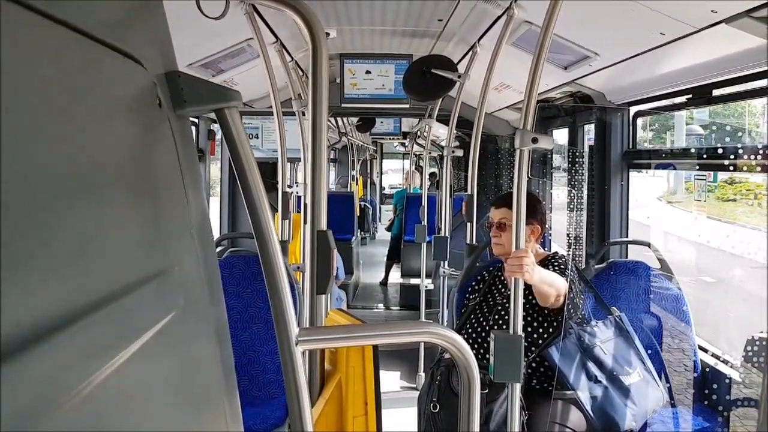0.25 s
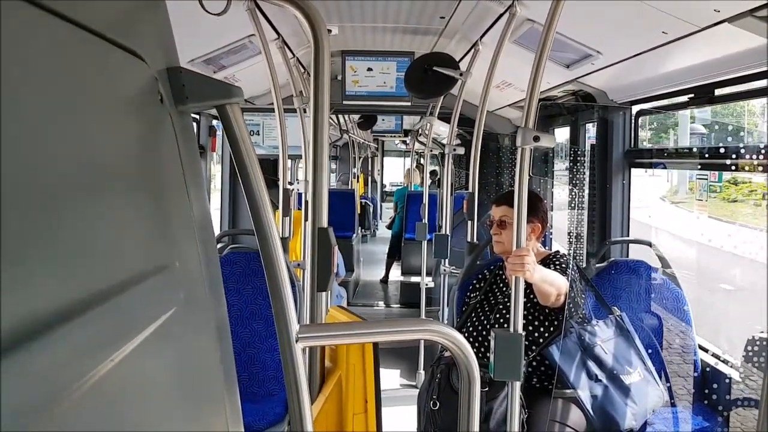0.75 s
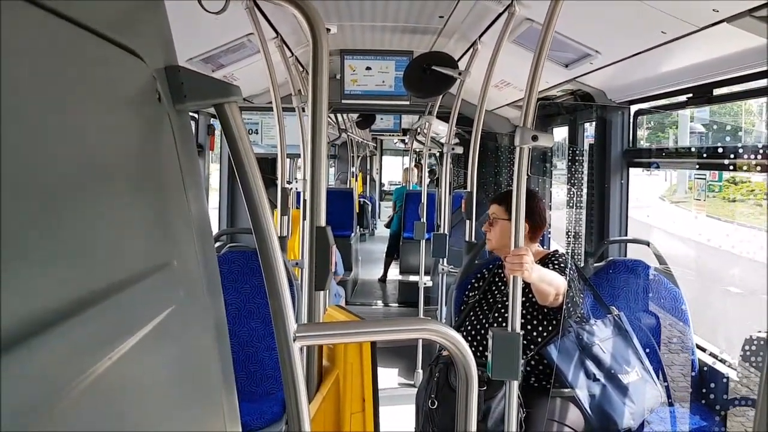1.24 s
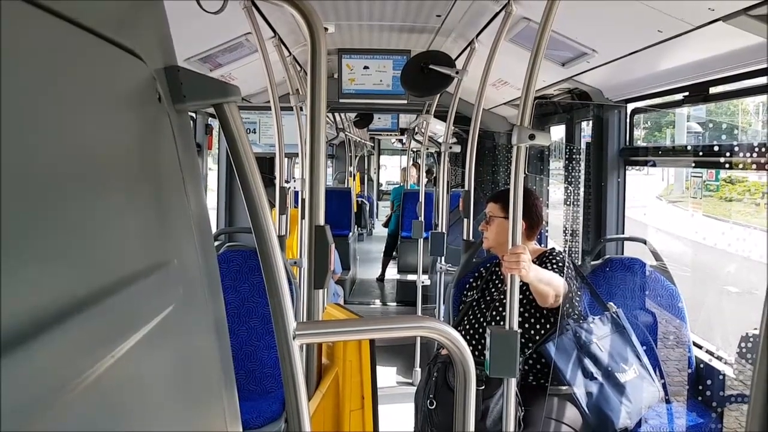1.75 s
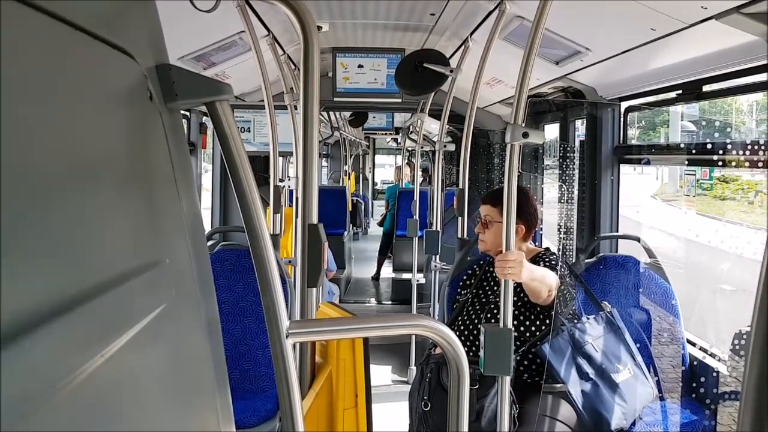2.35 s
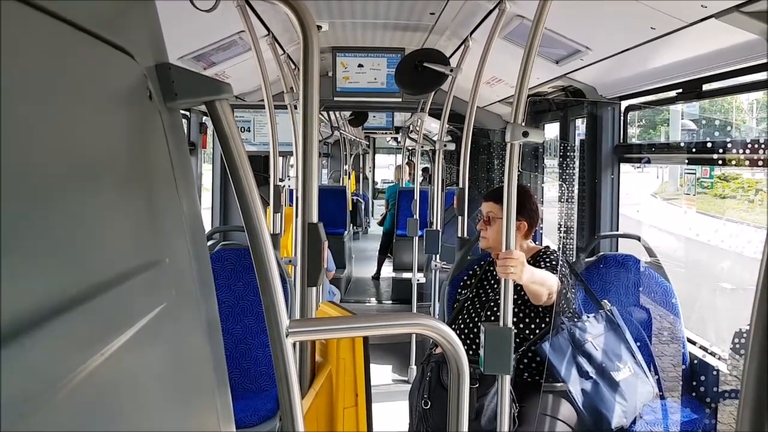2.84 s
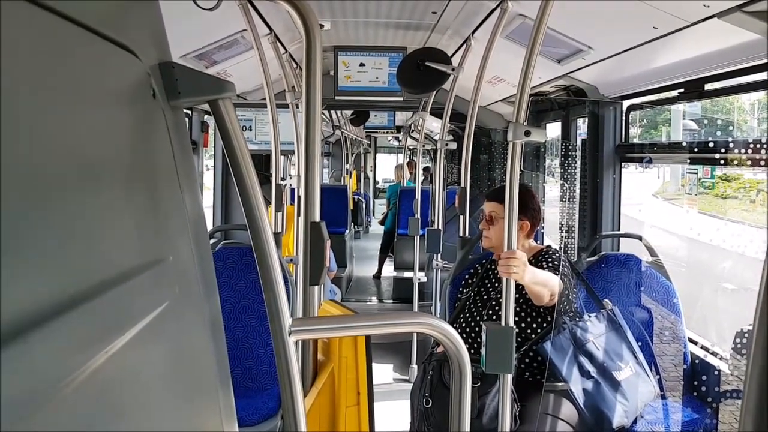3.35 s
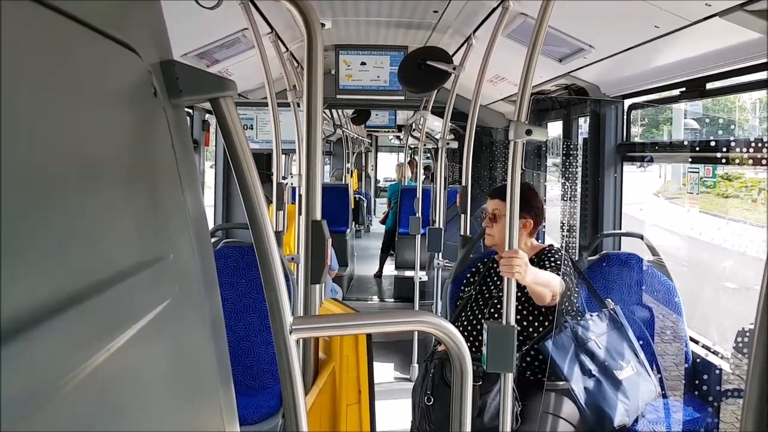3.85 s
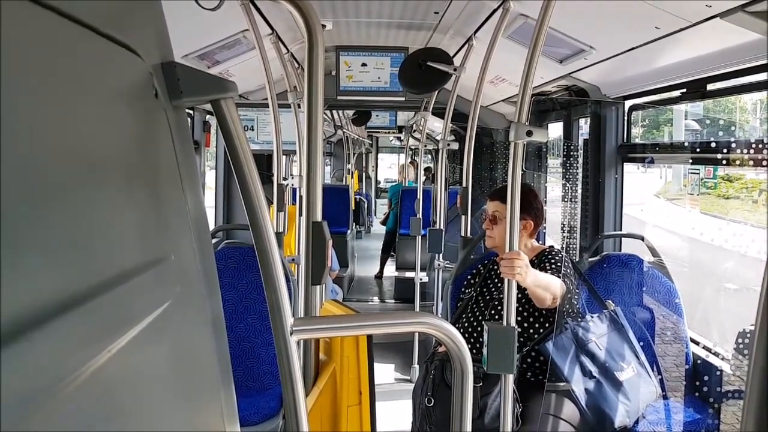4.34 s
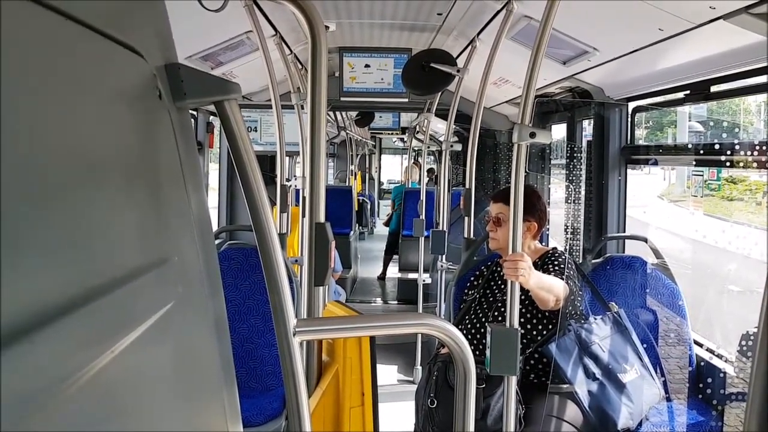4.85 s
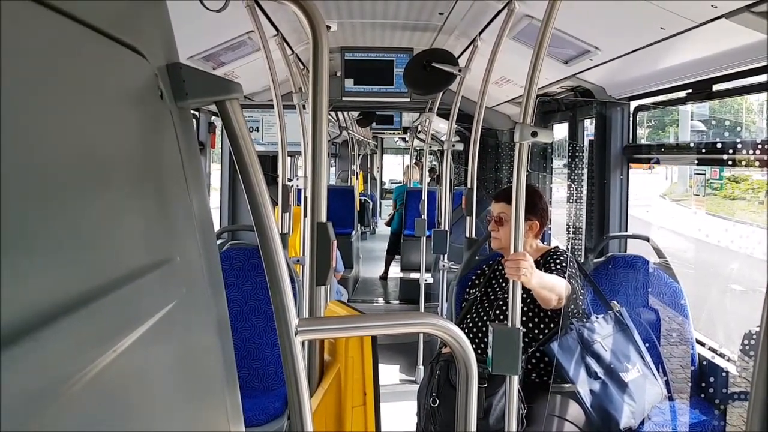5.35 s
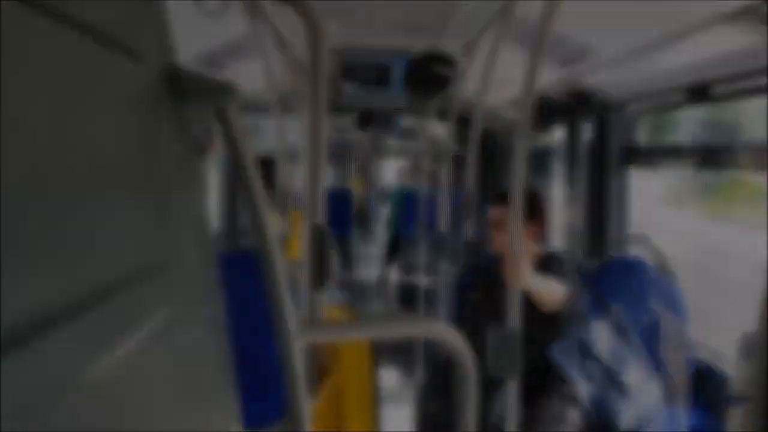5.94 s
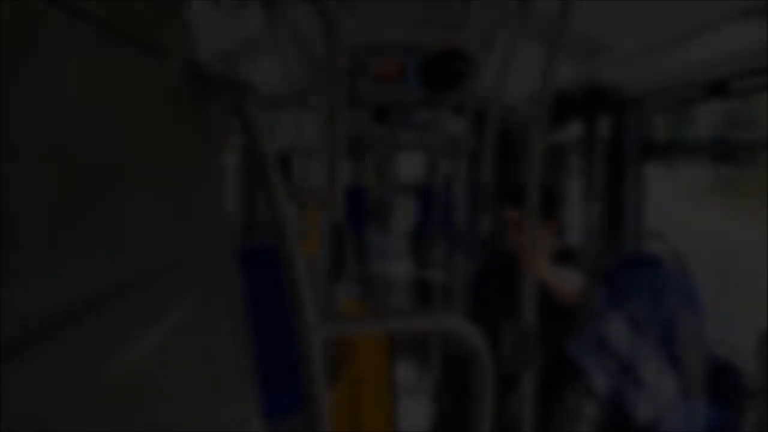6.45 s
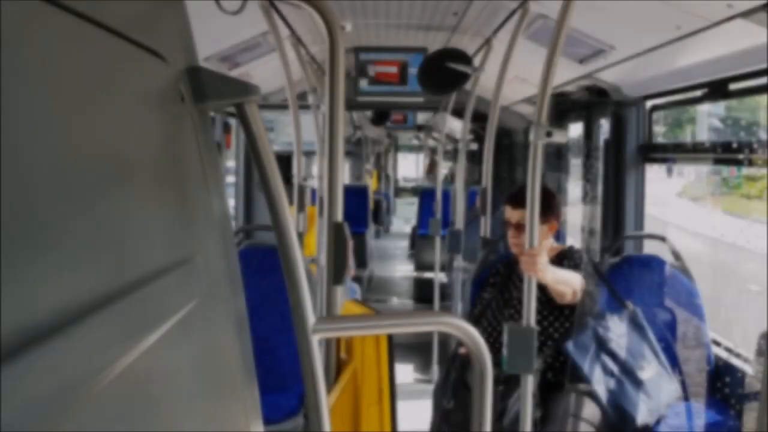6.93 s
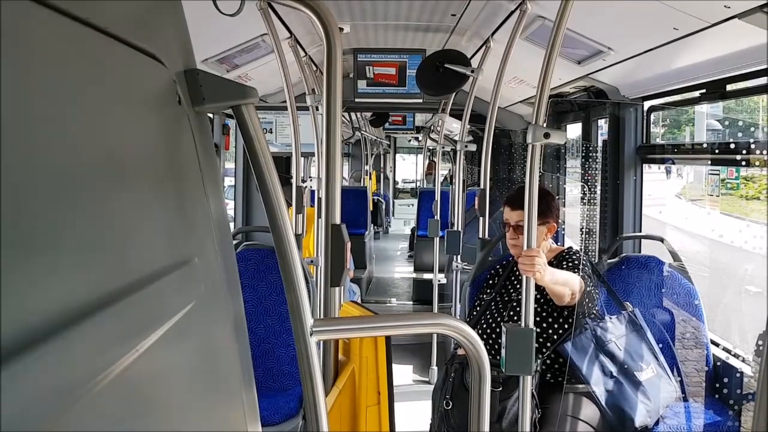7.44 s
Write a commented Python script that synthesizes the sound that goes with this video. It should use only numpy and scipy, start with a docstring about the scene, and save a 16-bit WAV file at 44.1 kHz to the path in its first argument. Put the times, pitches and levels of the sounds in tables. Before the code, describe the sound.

Heard from a seat inside a diesel bus, the engine drones steadily with a beating throb, under a thin wavering drivetrain whine and broad tyre roar. Loose panels knock and rattle in the first three seconds. The sound then softens around six seconds and swells back with low body booms and a rough rumble. Stereo cabin microphone, slight hiss.

```python
"""Inside a diesel city bus: the engine drones through the floor as harmonics of its crank, and a belt-driven
pump, harmonics of a slightly slower shaft, beats against it. The drivetrain whines as a wavering sine.
Filtered noise makes the tyres, the air and the body's rumble; decaying sines and noise make the knocking fittings.
The whole sound fades down, then comes back up with booms of the body and a heavier rumble."""
import sys
import numpy as np
from scipy import signal
from scipy.fft import rfft, irfft, next_fast_len
from scipy.io import wavfile
from scipy.ndimage import uniform_filter1d, map_coordinates

SR = 44100
rng = np.random.default_rng(int(sys.argv[2]) if len(sys.argv) > 2 else 0)


def dump(signal):
    """Clip the signal to [-1, 1] and save it as 16-bit WAV at the path in sys.argv[1]."""
    limited = np.clip(np.atleast_2d(signal).T, -1, 1)
    pcm = np.round(limited * 32767).astype(np.int16)
    wavfile.write(sys.argv[1], SR, pcm)


N = 339129
TIME = np.arange(N) / SR  # seconds

# Colour of the tyre noise. Each row: frequency in Hz, relative level in dB per Hz.
TYRE_COLOUR = [(300, -28.5), (480, 0.5), (610, 1), (760, 0.5), (880, -4.5), (1000, -8.5), (1200, -8),
               (1550, -15), (1850, -11), (2200, -19), (3000, -37), (5000, -75.5)]


def amp(db):
    """Turns decibels into a gain."""
    return 10 ** (np.asarray(db) / 20)


def unit(x):
    """Scales a signal to an rms of 1."""
    return x / np.sqrt(np.mean(x ** 2) + 1e-20)


def along(points, hz):
    """Reads a curve of (frequency, value) points on a logarithmic frequency axis."""
    f, v = np.transpose(points)
    return np.interp(np.log(hz + 1), np.log(f + 1), v)


def curve(points):
    """Joins (seconds, value) points by straight lines, one value per sample."""
    seconds, values = np.transpose(points)
    return np.interp(TIME, seconds, values)


def wobble(rate):
    """A smooth random curve through `rate` random points a second."""
    coarse = TIME[::32]
    knots = rng.standard_normal(int(N * rate / SR) + 4)
    smooth = map_coordinates(knots, [coarse * rate])
    return np.interp(TIME, coarse, smooth)


def angle(hz):
    """Adds up a changing frequency into a running phase in radians."""
    return 2 * np.pi * np.cumsum(hz) / SR


def swell(at, width):
    """A bell-shaped envelope around a moment, both in seconds."""
    return np.exp(-((TIME - at) / width) ** 2)


def filtered(x, response):
    """Multiplies the spectrum of x by a response that depends on frequency."""
    m = next_fast_len(N + 8192)  # spare room keeps the end from wrapping onto the start
    hz = np.fft.rfftfreq(m, 1 / SR)
    return irfft(rfft(x, m) * response(hz), m)[..., :N]


def tone(phase, side_db):
    """A stereo sine of rms 1; the cabin's standing waves shift its phase between the sides."""
    start = rng.uniform(0, 2 * np.pi)
    shift = np.arctan(amp(side_db))
    return np.sqrt(2) * np.sin([phase + start + shift, phase + start - shift])


def rush(spectrum, texture=unit):
    """Stereo noise of rms 1, even unless given a texture; the two sides differ by an amount set by frequency."""
    # How wide the noise is. Each row: frequency in Hz, side level against mid in dB.
    noise_width = [(40, -20.5), (150, -24.5), (220, -9.5), (280, -25.5), (420, -6.5), (700, -7.5),
                   (1000, 0), (1500, 5), (2500, 0), (6500, 0.5), (8500, -15), (14000, -2.5)]

    def shape(hz):
        mid_and_side = np.array([np.ones_like(hz), amp(along(noise_width, hz))])
        return amp(along(spectrum, hz)) * mid_and_side

    mid, side = filtered(texture(rng.standard_normal((2, N))), shape)
    return unit(np.array([mid + side, mid - side]))


def patchy(x, size=1024):
    """Gives noise short patches of random gain, so that its colour keeps shifting."""
    patch_db, patch_hz, patch_s = 1.7, 130, .06  # strength, width and length of the patches
    hz, t, z = signal.stft(x, SR, nperseg=size)
    field = rng.standard_normal(z.shape[1:])
    field = uniform_filter1d(field, round(patch_hz / hz[1]), axis=0)
    field = uniform_filter1d(field, round(patch_s / t[1]), axis=1)
    back = signal.istft(z * amp(patch_db * unit(field)), nperseg=size)[1]
    return unit(back[:, :N])


def road(crank):
    """Filtered noise: body rumble, cabin roar throbbing with the crank, tyres, and rushing air with a microphone's hiss."""
    # Colours of rumble and cabin roar. Each row: frequency in Hz, relative level in dB per Hz.
    rumble_colour, cabin_colour = [(10, -2), (22, 5), (35, 8), (52, 15), (66, 8.5), (82, 7), (105, 10),
                                   (130, 13.5), (170, -1), (300, -61)], [(90, -32), (160, -9.5), (220, -1.5), (255, -5),
                                                   (285, -8), (320, -2.5), (380, -2.5), (450, -8),
                                                   (520, -19), (900, -77)]
    # Rushing air with a faint high hiss from the microphone. Each row: frequency in Hz, relative level in dB per Hz.
    air_and_hiss_colour = [(1200, -27.5), (2300, 1), (2900, -3.5), (3600, -6), (4600, -13), (5500, -19.5),
                           (6000, -23), (6600, -26.5), (7800, -39), (9500, -40.5), (12000, -29.5),
                           (15000, -29)]
    rumble_db, cabin_db, tyre_db, air_and_hiss_db = -32.5, -31, -36, -51.5  # on even asphalt
    rough_s = 7.2  # a dip in the road
    rough = swell(rough_s, .12)
    shudder = swell(rough_s, .57)  # lasts longer
    throb = unit(1 + .25 * np.cos(crank) + .2 * np.cos(8 * crank))
    surface = wobble(14)  # slow shared unevenness of level, as on uneven asphalt
    rumble = amp(rumble_db + 6.5 * rough) * rush(rumble_colour)
    cabin = amp(cabin_db + 2.5 * shudder + .46 * surface) * throb * rush(cabin_colour)
    # the tyre noise softens slightly there
    tyres = amp(tyre_db - shudder + .58 * surface) * rush(TYRE_COLOUR, texture=patchy)
    air_and_hiss = amp(air_and_hiss_db + .78 * surface) * rush(air_and_hiss_colour)
    return rumble + cabin + tyres + air_and_hiss


def thin_tone(hz, db, side_db):
    """A sine whose pitch and level are slightly unsteady."""
    unsteady_hz = hz * (1 + .0015 * wobble(15))
    return amp(db + 3.3 * wobble(10)) * tone(angle(unsteady_hz), side_db)


def faint_tones():
    """Thin, unsteady sines; some last throughout, others glide in and out."""
    # Lasting thin tones, one of them beside the whine. Each row: frequency in Hz, level in dB.
    lasting_tones = [(1147, -61), (1330, -57.5), (1552, -63), (1762, -60), (2345, -68.5), (2570, -71),
                     (5556, -83.5)]
    # Gliding gear tones. Each row: start in seconds, end in seconds, first Hz, last Hz, level in dB.
    gliding_tones = [(.15, 1.7, 1866, 1855, -52.5), (2.05, 2.5, 1886, 1893, -53),
                     (6.85, 7.69, 665, 672, -46), (6.92, 7.55, 1110, 1150, -48.5),
                     (6.9, 7.1, 1980, 2150, -55)]
    fade_s = .048
    total = sum(thin_tone(hz, db, side_db=-4.5) for hz, db in lasting_tones)
    for start, end, first, last, db in gliding_tones:
        glide_hz = np.interp(TIME, [start, end], [first, last])
        gate = np.clip(np.minimum(TIME - start, end - TIME) / fade_s, 0, 1)
        total = total + gate * thin_tone(glide_hz, db, side_db=3.5)
    return total


def boom():
    """Resonances of the body swell and die away, slightly unsteady in pitch and strength."""
    # The body's booms. Each row: middle in seconds, half length in seconds, frequency in Hz, level in dB.
    body_booms = [(.79, .015, 375, -26), (6.794, .07, 56.3, -27), (6.82, .24, 190, -30),
                  (7.126, .13, 180.3, -25.7), (7.199, .07, 52, -30), (7.242, .076, 189.5, -26.5),
                  (7.282, .044, 368, -33.5), (7.446, .054, 182.6, -31), (7.6, .12, 255, -31.5),
                  (7.638, .06, 33.25, -26), (7.647, .025, 92, -23.5), (7.657, .053, 58.3, -25)]
    total = 0
    for s, width, hz, db in body_booms:
        unsteady_hz = hz * (1 + .012 * wobble(18))
        ringing = amp(1.5 * wobble(14)) * tone(angle(unsteady_hz), side_db=-20)
        total = total + amp(db) * swell(s, width) * ringing
    return total


def squeak():
    """A joint squeaks once: a short sine whose pitch is blurred by fast wavering."""
    hz = 5860 + 105 * wobble(700)
    return amp(-72) * swell(1.75, .035) * tone(angle(hz), side_db=-15)


def fittings():
    """Bumps thud in the tyres, ring a loose panel as decaying sines and shake its fasteners as bursts of noise."""
    # Knocks of the loose fittings. Each row: start in seconds, knock level in dB, rattle level in dB,
    # time for the rattle to fall 60 dB in seconds, bright tick level in dB.
    knocks = [(.181, -27.5, -51, .15, -63), (.194, -35.5, -58.5, .15, -72), (.355, -39, -62.5, .17, -71),
              (.888, -30, -53, .17, -72), (.912, -39, -50, .07, -80), (1.306, -40.5, -62, .17, -75),
              (1.903, -40.5, -54, .12, -68), (1.931, -40, -55.5, .17, -73), (2.848, -41.5, -57, .17, -72)]
    # Ringing of the panel. Each row: frequency in Hz, level against the knock in dB, time to fall 60 dB in seconds.
    panel_modes = [(342, 1.5, 0.17), (572.5, 2.5, 0.11), (656, 3, 0.051), (1303, -11.5, 0.074),
                   (1696, -13.5, 0.12), (2000, -23.5, 0.11), (2670, -23.5, 0.071)]
    # Colours of rattle and tick. Each row: frequency in Hz, relative level in dB per Hz.
    rattle_colour, tick_colour = [(800, -2), (2500, 5), (4500, 2), (6500, -13), (8500, -28), (12000, -21.5),
                                  (15000, -17)], [(3000, -16), (6000, 2.5), (8500, -11), (12000, -1.5),
                                                  (15000, -0.5)]
    thud_db, thud_t60_s = -6, .05  # level against the knock; time to fall 60 dB
    tick_t60_s = .13
    chatter_rad = .7  # random phase scatter as the loose panel rings
    ring = np.zeros((2, N))
    thud, shake, tick = np.zeros((3, N))
    age = np.arange(SR // 3) / SR  # seconds since the knock
    rise = 1 - np.exp(-age / .00064)
    for s, knock_db, rattle_db, rattle_t60, tick_db in knocks:
        first = int(s * SR)
        span = slice(first, first + len(age))
        thud[span] += rise * amp(knock_db + thud_db - 60 * age / thud_t60_s)
        shake[span] += rise * amp(rattle_db - 60 * age / rattle_t60)
        tick[span] += rise * amp(tick_db - 60 * age / tick_t60_s)
        for hz, db, t60 in panel_modes:
            phase = 2 * np.pi * hz * age + chatter_rad * wobble(120)[span]
            ring[:, span] += rise * amp(knock_db + db - 60 * age / t60) * tone(phase, side_db=-8.5)
    rattle = shake * rush(rattle_colour) * amp([[.5], [2.5]])  # 2 dB stronger on the right
    return ring + thud * rush(TYRE_COLOUR) + rattle + tick * rush(tick_colour) + squeak()


def whine():
    """A wavering drivetrain tone that reaches the two sides in nearly opposite phase."""
    # Drifting pitch of the whine. Each row: time in seconds, frequency in Hz.
    pitch = [(0, 1739), (.9, 1739.5), (1.17, 1745), (1.55, 1737), (1.85, 1740), (2.03, 1735), (2.24, 1744),
             (2.43, 1733), (2.97, 1743), (3.25, 1737), (3.6, 1741), (4.15, 1733), (4.45, 1734),
             (4.65, 1740.5), (5.3, 1737), (5.68, 1742), (6, 1737.5), (7.69, 1739)]
    # How it grows and fades. Each row: time in seconds, level in dB before flutter and dips.
    loudness = [(0, -32), (.4, -32), (.6, -35.5), (.78, -31), (1.15, -33.5), (1.37, -29.5), (1.7, -33.5),
                (1.95, -31.5), (2.45, -33.5), (3, -31.5), (3.6, -30.5), (4, -33.5), (4.45, -35),
                (4.62, -31.5), (4.87, -30), (5.3, -34), (5.9, -35.5), (6.5, -33), (7.3, -38), (7.69, -43)]
    # Its brief dips. Each row: middle in seconds, half length in seconds.
    brief_dips = [(1.58, 0.07), (4.15, 0.055), (6.04, 0.021), (6.64, 0.028), (7.136, 0.055), (7.49, .035)]
    # How far apart the sides drift in phase. Each row: time in seconds, side level against mid in dB.
    spread = [(0, 18.5), (1.5, 22), (7.69, 23)]
    jitter_hz, flutter_db, dip_db = 2.2, 2, -12  # fast wavering of pitch and level; depth of the dips
    hz = curve(pitch) + jitter_hz * wobble(30)
    dips_db = dip_db * sum(swell(s, width) for s, width in brief_dips)
    level_db = curve(loudness) + flutter_db * wobble(25) + dips_db
    return amp(level_db) * tone(angle(hz), side_db=curve(spread))


def clatter(crank, size=4096):
    """A pattern of knocks repeats with every crank turn, smeared by its paths through the body."""
    # The many weak engine overtones. Each row: multiple of the crank speed, relative level in dB.
    overtones = [(1, -28.5), (12, -14), (17, -6), (22, 0.5), (28, 4.5), (34, -5), (52, -14), (62, -14),
                 (90, -14), (130, -19.5), (200, -39)]
    k = np.arange(size // 2 + 1)
    strength = amp(along(overtones, k)) * (k < 200)
    # random phases spread the knocks over the turn
    mid, side = irfft(strength * np.exp(2j * np.pi * rng.random((2, len(k)))))
    place = ((crank + .0089 * wobble(6)) / (2 * np.pi) % 1) * size

    def read(turn):
        return np.interp(place, np.arange(size + 1), np.append(turn, turn[0]))

    return unit(np.array([read(mid + .5 * side), read(mid - .5 * side)]))


def orders(shaft, table, flutter_db, jitter, swells):
    """Harmonics of a turning shaft; the higher ones waver more, and some swell along their own curves."""
    total = 0
    for k, db, side_db in table:
        flutter = flutter_db * k ** .19 * wobble(8)
        phase = k * (shaft + jitter * wobble(4))  # jitter is in radians of the shaft
        total = total + amp(db + swells.get(k, 0) + flutter) * tone(phase, side_db)
    return total


def engine(crank):
    """Firing orders follow the load; valve train and clatter do not; a slightly slower pump beats against them."""
    # Firing orders, then valve train and timing gears. Each row: multiple of the crank speed,
    # relative level in dB, side level against mid in dB.
    firing_lines, valve_lines = [(4, -29.3, -30), (6, -50, -11), (9, -45.5, -20), (10, -34.5, -23),
                                 (11, -44, -22), (13, -31.7, -22), (14, -37.5, -8), (15, -41.5, -6),
                                 (16, -44, -18), (18, -45, -21), (19, -44, -19), (21, -45.5, -15),
                                 (24, -36.2, -12), (25, -47, -7), (26, -45, -12), (27, -42.5, -14)], [(12, -35, -25), (29, -48, -13), (30, -50, -12),
                                                 (32, -51.5, -7), (36, -55, -8), (38, -50.5, -7),
                                                 (41, -55, -8), (44, -48, -17), (45, -51, -12),
                                                 (50, -49.5, -15), (52, -52.5, -10), (60, -57, -6),
                                                 (61, -55, -6), (73, -57.5, -4), (81, -58.5, -3),
                                                 (84, -60, -3)]
    # Pump. Each row: multiple of the pump speed, relative level in dB, side level against mid in dB.
    pump_lines = [(2, -36.5, -24), (3, -37.5, -30), (4, -42, -25), (7, -47, -25), (8, -35, -26),
                  (14, -40, -20), (20, -45, -20), (25, -45.5, -12), (27, -45, -9), (42, -46.5, -9)]
    # The engine pulls, then eases off. Each row: time in seconds, load in dB.
    load = [(0, -0.8), (1.4, -0.7), (1.85, -0.5), (2.3, -0.1), (3.3, 0), (4.4, -1.9), (5.2, -0.5),
            (5.65, -0.5), (6.1, -4), (6.4, -5), (7.69, -5)]
    # The hum (13th order) and the growl (24th) wax and wane in the cabin. Each row: time in seconds, change in dB.
    hum, growl = [(0, 1), (.55, 3), (1, -2), (1.55, 4), (2.25, -4.5), (2.85, 1.5), (3.3, -2.5), (3.8, 1.5),
                  (4.3, 2.5), (4.8, 0), (5.3, 3), (6, -4.5), (6.7, 4), (7.69, -2)], [(0, 3), (1.05, -0.5), (1.45, -4), (1.95, 4), (2.3, 1.5), (2.62, -2.5),
                               (2.9, 3), (3.4, 4.5), (3.7, -4), (4.6, 2), (5.15, 1), (5.8, 5), (6.25, 3.5),
                               (7.69, -2.5)]
    belt = .9462  # pump turns per crank turn
    drone_db, valve_db, pump_db, clatter_db = 1.3, 0, -.24, -37  # the drone's is at a load of 0 dB
    swells = {13: curve(hum), 24: curve(growl)}
    drone = orders(crank, firing_lines, flutter_db=.68, jitter=.011, swells=swells)
    valves = orders(crank, valve_lines, flutter_db=1.12, jitter=.013, swells={})
    pump = orders(belt * crank, pump_lines, flutter_db=.5, jitter=.019, swells={})
    steady = amp(valve_db) * valves + amp(pump_db) * pump + amp(clatter_db) * clatter(crank)
    return amp(drone_db + curve(load)) * drone + steady


def scene():
    """Everything heard from a seat in the cabin; the whole sound fades down, then comes back up."""
    # Engine speed. Each row: time in seconds, crank turns per second.
    crank_speed = [(0, 14.92), (.6, 14.79), (1.5, 14.73), (2.2, 14.91), (3.3, 14.84), (4.8, 14.78),
                   (5.5, 14.87), (7, 14.72), (7.69, 15.2)]
    # The whole sound fades down, then comes back up. Each row: time in seconds, level in dB.
    overall_fade = [(0, -0.5), (4.4, -0.5), (5.4, -3.5), (6.15, -8), (6.5, -8), (7.1, -5), (7.69, 0)]
    # The cabin favours one side or the other. Each row: frequency in Hz, left level against right in dB.
    cabin_lean = [(60, -.5), (140, 1), (200, 1), (260, 0.5), (380, 3), (520, -1.5), (850, 1), (1500, -1.6),
                  (3400, 4), (4100, -2.5), (7000, 0)]
    crank = angle(curve(crank_speed))
    mix = road(crank) + faint_tones() + boom() + fittings() + whine() + engine(crank)

    def lean(hz):
        return amp(along(cabin_lean, hz) * np.array([[.5], [-.5]]))

    return amp(curve(overall_fade)) * filtered(mix, lean)


def record(dry):
    """The recorder keeps nothing above its band limit."""
    top_hz = 15720
    return filtered(dry, lambda hz: hz < top_hz)


dry = scene()
out = record(dry)
dump(out)
```